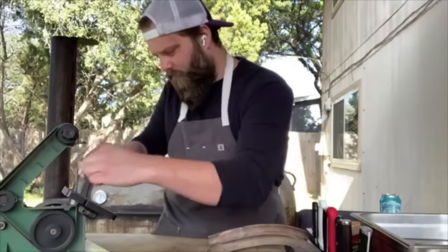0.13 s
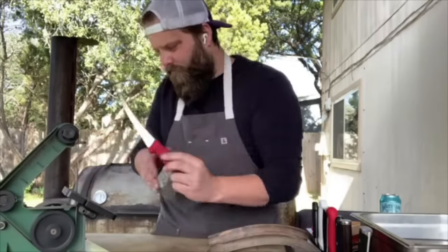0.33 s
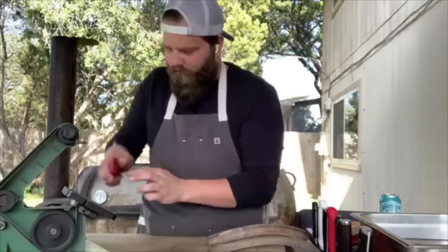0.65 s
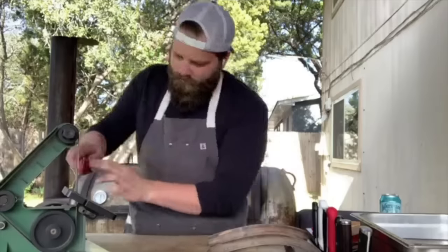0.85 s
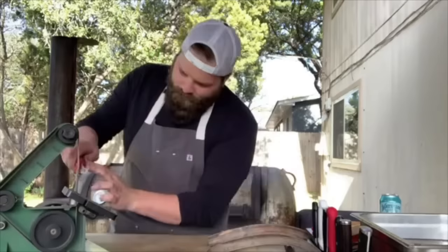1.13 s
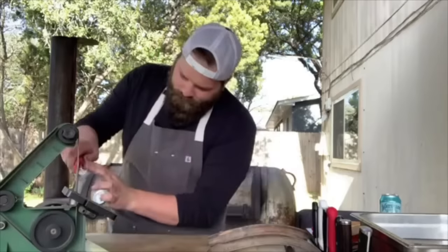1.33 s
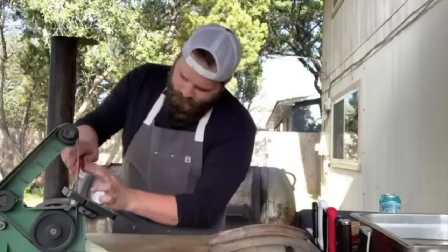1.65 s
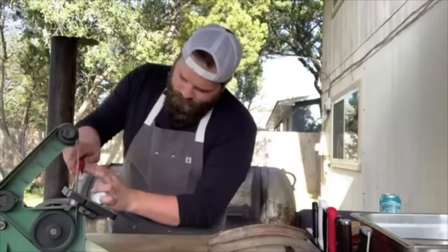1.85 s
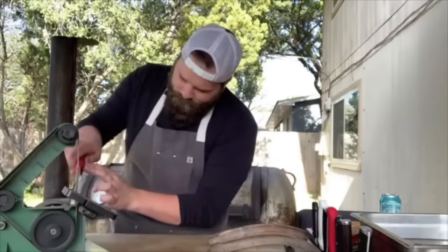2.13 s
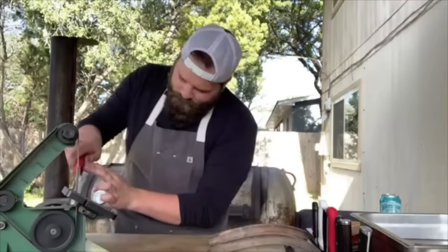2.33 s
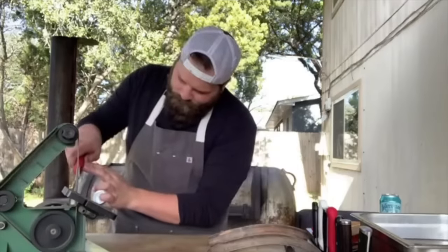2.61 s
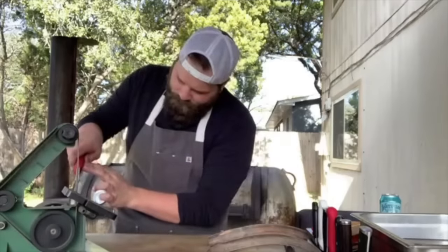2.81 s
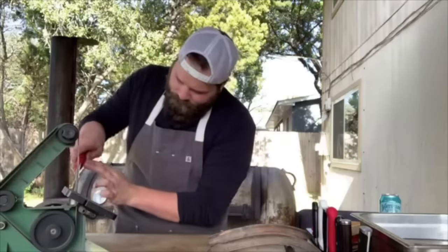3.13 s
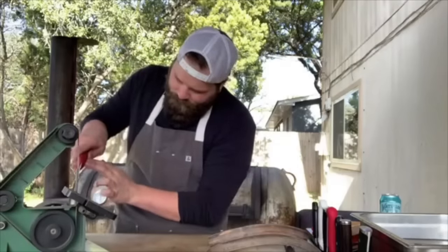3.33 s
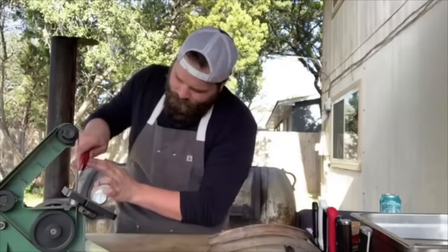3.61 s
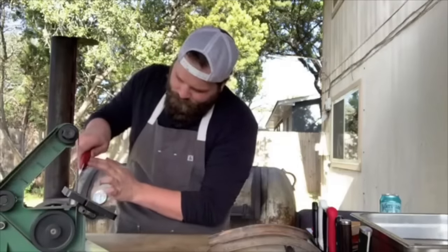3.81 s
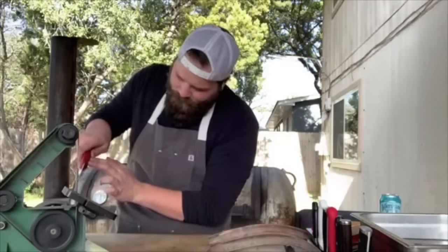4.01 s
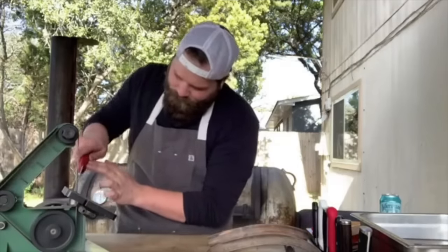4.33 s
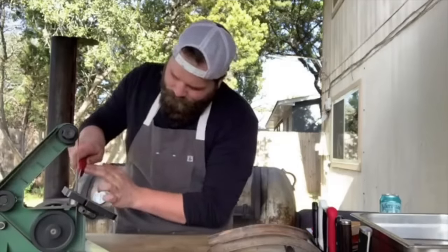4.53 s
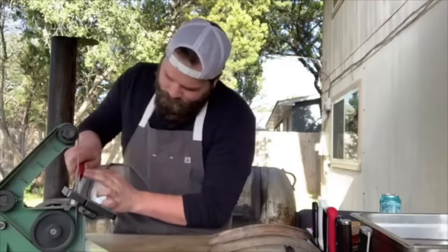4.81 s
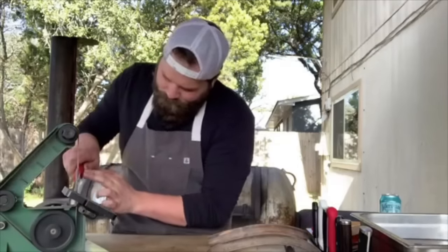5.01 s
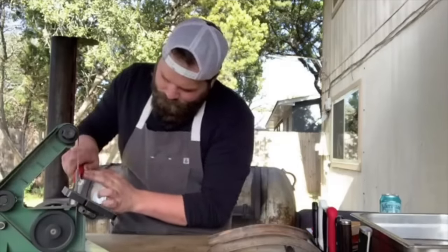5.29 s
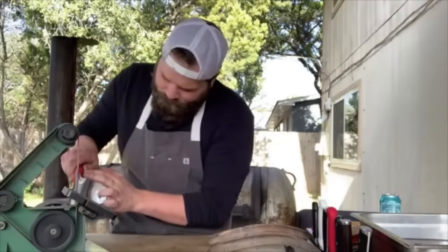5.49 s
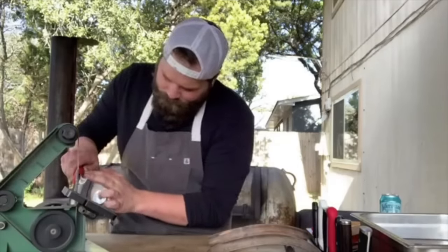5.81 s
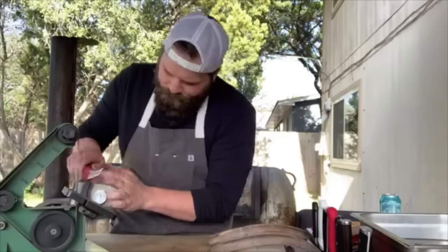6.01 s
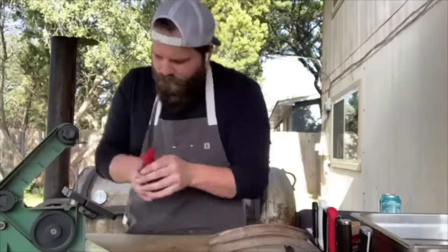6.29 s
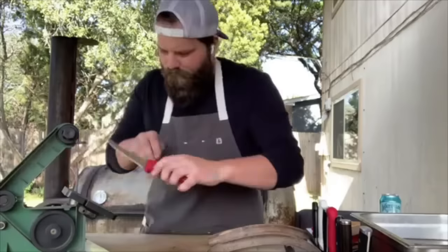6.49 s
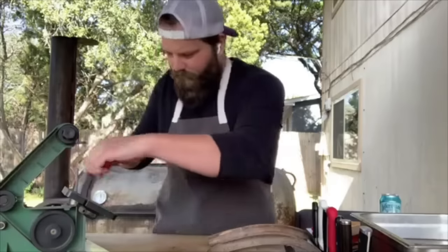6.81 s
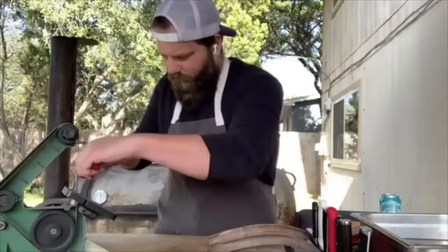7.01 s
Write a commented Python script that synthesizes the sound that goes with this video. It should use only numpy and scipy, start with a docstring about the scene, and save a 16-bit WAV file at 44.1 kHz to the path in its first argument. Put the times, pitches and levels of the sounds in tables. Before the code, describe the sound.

A small belt sander runs throughout in a yard beside a house wall, its gritty belt hissing and fluttering very fast. A knife touches lightly and the wheel sings in short high swells; then the blade bears down, grinding and chattering in short metallic squeals, worst near two seconds. It settles to steady scraping with sharp grain ticks, then lifts as the singing returns. Close, mono, thin narrow-band microphone with little bass.

```python
"""Beside a house wall in a yard, a small belt sander runs; its gritty belt hisses in time with a small wheel.
A knife presses briefly, then barely touches, and the wheel sings in short swells until about 1.4 s.
The blade bears down, hardest at 2 s: the wheel slows, grit grinds and the steel chatters in short squeals.
From about 3.7 s mostly grinding and sharp ticks of coarse grains are left; after 6.2 s the blade eases off
and the song returns. Filtered noise, friction-driven modes and sines pass a narrow-band microphone."""
import sys
import numpy as np
from scipy import signal
from scipy.fft import rfft, irfft, next_fast_len
from scipy.io import wavfile
from scipy.ndimage import uniform_filter1d

SR = 44100
rng = np.random.default_rng(int(sys.argv[2]) if len(sys.argv) > 2 else 0)


def master_out(mix):
    """Clip the mix to full scale and print it as 16-bit PCM to the path in sys.argv[1]."""
    frames = np.transpose(np.atleast_2d(mix))
    ceiling = np.clip(frames, -1, 1)
    pcm = np.round(ceiling * 32767).astype(np.int16)
    wavfile.write(sys.argv[1], SR, pcm)


N = 315315
TIME = np.arange(N) / SR

# Layer levels hold ahead of the echoes and the microphone.
# low rumble of motor and air: f/Hz, relative level/dB per Hz
RUMBLE_COLOUR = [(25, -25.5), (45, -12.5), (70, -7), (120, -3.5), (250, -2), (350, -1), (480, -1.5),
                 (600, 3), (780, 1.5)]
# low rumble, and thrum of the frame under the blade: t/s, rumble level/dB, thrum level/dB
RUMBLE_LEVEL = [(0, -70, -94), (.7, -72, -94), (1.1, -70, -80.5), (2, -69, -79), (2.8, -72, -84),
                (3.8, -75, -96), (5.6, -71.5, -96.5), (7.15, -74, -98)]
# thin motor whine that comes and goes: t/s, mean f/Hz, level/dB ahead of its waver
WHINE = [(0, 700, -92), (1.9, 693, -91), (2.75, 697, -79), (3.3, 700, -90), (3.75, 706, -81),
         (4.35, 704, -85.5), (4.9, 707, -93), (5.4, 708, -78), (6.0, 710, -83), (6.25, 723, -80),
         (7.15, 716, -79)]
# steady notes of the drive: f/Hz running free, level/dB ahead of the waver
DRIVE_NOTES = [(818, -73), (885, -62), (916, -66)]
DRIVE_SAG = .012   # share of the pitch lost at full pressure
DRIVE_WANDER_HZ, DRIVE_WAVER_DB = 1.52, 2.5   # rms
# air whirring round the free run of the belt: t/s, level/dB
WHIRR = [(0, -52.5), (.5, -51), (1.1, -54.5), (2.1, -54.5), (3.4, -61), (4.7, -55), (6.1, -58.5),
         (6.38, -50.5), (6.7, -57), (7.15, -56)]
# dull rush between the whirr and the grinding: t/s, level/dB
RUSH = [(0, -69), (.3, -68), (1.0, -58), (1.5, -59.5), (2.0, -58.5), (2.7, -56), (3.8, -55), (6.3, -53.5),
        (7.15, -57.5)]
# colour of belt and steel: f/Hz, relative level/dB per Hz
COLOUR = [(600, -9), (900, -10.5), (1080, -5), (1300, -8.5), (1550, -4), (1950, -5), (2500, -6.5),
          (3400, -8), (3900, -10.5), (4600, 4), (5500, 6), (6100, 1.5), (6600, -7.5), (7300, -5)]
# resonances of frame, wheels and plate: f/Hz, width/Hz, lift/dB
RESONANCES = [(821, 9, 4), (874, 16, 8), (908, 12, 4.5), (1697, 54, 4), (1970, 130, 2.5), (2340, 46, 4),
              (3660, 300, 0), (4126, 250, 4), (4840, 67, 2.5), (5290, 100, 3), (5550, 140, -4.5),
              (5865, 71, 3.5), (6885, 93, 8), (7300, 150, 6)]
# belt running over plate and wheel: t/s, zing level/dB ahead of its trim, nominal flutter depth/dB
BELT = [(0, -34, -0.7), (.25, -37.5, 2.2), (.7, -37.5, 2), (1.2, -34, 1.5), (1.6, -33, 2), (1.87, -33, 1.5),
        (2.04, -31, 1.5), (2.3, -36, 2), (2.46, -35, 1.5), (2.57, -38, -0.5), (2.83, -34.5, 3),
        (3.1, -36, 1), (3.5, -36.5, -0.5), (4.1, -38, 2.3), (4.55, -36, 1.2), (5.1, -36.5, 2),
        (5.85, -35.5, 2), (6.17, -34.5, 2.5), (6.5, -38.5, 3), (7.15, -40.5, 3)]
FREE_TURNS_PER_S, DRAG_TURNS_PER_S = 72.9, 6.8   # nominal: running free, and lost at full pressure
# a steel wheel sings under the belt and swells: t/s, f/Hz, level/dB, length/s
SONG_SWELLS = [(0.457, 4920, -34, 0.014), (0.827, 2466, -43, .05), (0.929, 4930, -35.5, 0.024),
               (1.015, 4910, -37, 0.04), (1.1, 4930, -23, .005), (1.104, 4945, -28, 0.012),
               (1.147, 4950, -35, .026), (1.19, 4930, -41, 0.25), (1.326, 4930, -37, 0.018),
               (1.2, 2485, -46, 0.2), (1.359, 2466, -39, .05), (6.24, 4920, -43, 0.08),
               (6.703, 4900, -44, 0.021), (6.777, 4920, -46, 0.047), (6.869, 4840, -41, 0.047),
               (6.93, 4910, -42.5, .1), (7.02, 4930, -38, 0.032), (7.10, 4920, -39, 0.028)]
SONG_HZ, SONG_DB = 4990, -55.5   # between the swells
SONG_SHARPNESS = 85   # pitch over nominal width
# coarsest grains hit the steel at the crest of a turn: t/s, level/dB ahead of band and trim
TICKS = [(.110, -31), (.178, -29), (0.385, -31), (0.917, -33), (.999, -34), (1.013, -28), (1.042, -28),
         (1.066, -26.5), (1.136, -31), (1.151, -24.5), (1.166, -27), (1.1786, -25), (1.248, -27),
         (1.289, -32), (1.3156, -28), (1.331, -31), (1.344, -32), (1.357, -30), (1.370, -28),
         (1.3843, -26.5), (1.938, -29), (1.967, -29), (2.028, -26), (2.042, -25.5), (2.120, -31),
         (2.153, -23), (2.240, -22.5), (2.360, -27), (2.825, -27), (2.837, -28), (2.851, -30), (3.313, -26),
         (3.438, -27), (4.497, -28), (4.619, -28), (4.722, -32), (5.039, -32), (5.052, -28), (5.1912, -28),
         (5.221, -31), (5.2466, -28), (5.29, -27.5), (5.3028, -25), (5.400, -28.5), (5.541, -29),
         (5.555, -25), (5.595, -30), (5.610, -32), (5.623, -19.5), (5.748, -31), (5.775, -37), (5.790, -35),
         (5.888, -30), (5.902, -31), (5.930, -30), (5.970, -34), (5.999, -31), (6.012, -31), (6.026, -28),
         (6.039, -27), (6.109, -29), (6.137, -27.5), (6.166, -28), (6.192, -29.5), (6.235, -27.5),
         (6.276, -31), (6.302, -32)]
# finer grains, in dB: against the zing, rise per dB of flutter, spread
TICK_OVER_DB, TICK_PER_FLUTTER, TICK_SPREAD_DB = -4.5, 1.0, 0.8
# one stroke of the knife: t/s, pressure on the belt 0-1, rasp level/dB of the edge
STROKE = [(0, 0.56, -36.5), (.17, .05, -40.5), (.8, 0.06, -41), (1.199, 0.52, -40.5), (1.75, 0.64, -39.5),
          (2.0, 1, -36.5), (2.22, .85, -36), (2.35, 0.55, -34.5), (2.47, 0.66, -35.5), (2.68, 0.61, -38.5),
          (3.549, 0.5, -38.5), (3.85, 0.43, -40.5), (4.3, .38, -40.5), (4.7, 0.5, -39.5), (5.25, 0.39, -40),
          (5.6, .45, -41), (5.92, 0.6, -40.5), (6.2, .25, -42), (6.45, 0.06, -42.5), (7.15, 0.2, -45)]
# brief dips of belt and grinding: t/s, change/dB, length/s
DIPS = [(3.394, -12, 0.012)]
# modes that steady grinding, then rasp, keeps ringing: f/Hz, level/dB against that drive ahead of feedback
SUSTAINED = [(1920, -1.5), (3490, -10.5)]
# blade bumping the backing plate: t/s, level/dB
BUMPS = [(1.909, -35.5), (1.914, -34)]
# modes of the blade: f/Hz, nominal width/Hz, relative level/dB
BLADE_MODES = [(1596, 280, -20), (1950, 156, -11), (2370, 240, -7), (3125, 260, -21.5), (3540, 160, -19),
               (4480, 140, -13.5), (4900, 110, -20.5), (5200, 270, -5), (5650, 280, -7.5), (5940, 260, -12)]
RING_DB_PER_PRESSURE = 18   # how steeply all modes together rise from no to full pressure
# the blade catches on the belt and squeals: t/s at the middle, f/Hz, level/dB ahead of trim, length/s
CATCHES = [(1.058, 2050, -30.5, 0.0056), (1.097, 1750, -21, 0.0024), (1.1005, 1960, -22, 0.0035),
           (1.108, 1750, -28, 0.0065), (1.144, 1680, -35, 0.0064), (1.180, 1630, -36.5, .007),
           (1.264, 1658, -27.5, 0.0086), (1.318, 1660, -36.5, .006), (1.455, 1533, -33, 0.021),
           (1.593, 1930, -22, 0.005), (1.601, 1900, -25, 0.0052), (1.609, 1850, -22.5, .004),
           (1.6435, 1845, -21, .004), (1.662, 1800, -31, 0.0057), (1.6935, 1930, -24, .005),
           (1.704, 1813, -31, 0.014), (1.724, 1620, -33.5, 0.008), (1.750, 1560, -35, .006),
           (1.770, 1886, -28, 0.0096), (1.800, 1630, -36, .005), (1.838, 1944, -28.5, 0.015),
           (1.863, 3520, -32.5, 0.0094), (1.870, 2110, -24.5, 0.0068), (1.887, 2330, -31, 0.0068),
           (1.891, 1970, -26, 0.0091), (1.944, 2020, -25, 0.0089), (1.945, 2400, -27, 0.0087),
           (1.949, 3630, -36, .007), (1.967, 2050, -23, 0.0041), (1.990, 2330, -27, 0.0073),
           (1.985, 5400, -29, .006), (2.000, 5420, -30, 0.008), (2.003, 1983, -22.5, 0.03),
           (2.028, 2420, -26.5, .007), (2.028, 5600, -26, .0053), (2.049, 1907, -21.5, 0.009),
           (2.056, 5480, -30, .007), (2.084, 5600, -31, .006), (2.075, 1950, -26, 0.015),
           (2.077, 4820, -26, 0.0059), (2.106, 2114, -23, 0.008), (2.106, 5300, -30, .009),
           (2.110, 3500, -31, 0.0075), (2.148, 1990, -28.5, 0.0081), (2.152, 2480, -28, 0.0084),
           (2.167, 1790, -26, 0.0035), (2.174, 2890, -28.5, 0.016), (2.226, 1990, -27, 0.011),
           (2.228, 4650, -33, .012), (2.255, 3240, -24.5, 0.0093), (2.256, 5330, -26, 0.0064),
           (2.268, 5600, -30, 0.0069), (2.289, 3070, -23.5, 0.005), (2.301, 1880, -27, 0.01),
           (2.332, 3080, -29.5, .006), (2.387, 3370, -28, .01), (2.399, 1870, -34.5, .008),
           (2.406, 3500, -27.5, .013), (2.404, 4050, -35, .004), (2.411, 2770, -23.5, 0.0047),
           (2.429, 3480, -25, 0.0096), (2.426, 1895, -33, 0.0091), (2.437, 2540, -28, 0.004),
           (2.446, 3450, -24, .008), (2.4505, 3180, -17.5, 0.0024), (2.453, 2660, -26, .003),
           (2.461, 3460, -26, 0.0089), (2.479, 2840, -36.5, .008), (2.481, 3500, -23.5, 0.011),
           (2.494, 3580, -23.5, .01), (2.462, 4140, -34.5, .012), (2.503, 4150, -31.5, 0.006),
           (2.516, 4250, -34, .006), (2.507, 3544, -26.5, 0.011), (2.503, 1930, -27.5, 0.012),
           (2.517, 3430, -24.5, 0.0083), (2.518, 1960, -24.5, 0.0043), (2.542, 1900, -33, 0.0039),
           (2.556, 3460, -30, 0.022), (2.583, 3425, -29, .015), (2.615, 3430, -27, 0.013),
           (2.617, 1880, -30.5, 0.0095), (2.682, 1990, -29, 0.0031), (2.712, 2090, -36, .008),
           (2.727, 1770, -34.5, 0.0097), (2.755, 3470, -36.5, 0.016), (2.793, 3440, -38.5, 0.0099),
           (2.922, 1925, -32.5, 0.0063), (2.959, 2000, -27.5, 0.0089), (2.973, 3419, -37, .012),
           (2.993, 2030, -29, 0.0094), (3.036, 2090, -30.5, 0.0078), (3.041, 2300, -30, 0.0048),
           (3.054, 3520, -27.5, 0.011), (3.154, 2070, -30, 0.0051), (3.329, 3530, -34, 0.0058),
           (3.331, 1990, -27.5, 0.016), (3.384, 1965, -27.5, 0.0072), (3.423, 1870, -28.5, 0.009),
           (3.461, 1990, -27, 0.008), (3.503, 1700, -33.5, 0.0058), (3.577, 2200, -33, 0.0097),
           (3.579, 3570, -35.5, 0.012), (3.600, 5000, -32.5, 0.01), (3.612, 1990, -35, 0.026),
           (3.652, 1820, -27.5, 0.0025), (4.775, 3400, -41, 0.029), (4.8245, 3440, -25, .004),
           (5.626, 5270, -29, 0.0064), (5.924, 1905, -29, 0.0083)]
# lesser catches at random; below the grip pressure they are all but silent
SMALL_CATCH_COUNT, SMALL_CATCH_S, GRIP_PRESSURE = 220, 0.007, 0.4
SMALL_CATCH_DB, SMALL_CATCH_SPREAD_DB = -26, 5   # base for a grip of 1, and spread
SMOOTH_BITE_DB = -4.5   # change while the edge runs smoothly
FULL_RASP_PRESSURE = 0.71   # under lighter pressure a squeal carries less rasp
# a squeal is pure while the edge rasps little and turns coarse as it rasps more
PURE_RASP_DB, COARSE_RASP_DB = -40.5, -35.5
# share of nominal mode width, evenness 0-1, depth of stick and slip/dB, drive of the other modes/dB
PURE_SQUEAL, COARSE_SQUEAL = (.5, .8, 1.5, -5), (1.05, .45, 3.4, 1)
SLIPS_PER_S = 560   # new random stick-slip levels a second
# echoes from bench, sander body, ground and wall: delay/s, level/dB
ECHOES = [(.00262, -31), (.00305, -26), (.0069, -17.5), (0.0122, -15), (0.016, -15)]
# the microphone's bass cut sets in abruptly: f/Hz, gain/dB
BASS_CUT = [(30, -53), (500, -20), (775, -13), (808, -1)]
CUTOFF_HZ = 8020


def from_db(db):
    """Gain of a level in dB."""
    return 10 ** (np.asarray(db) / 20)


def rms_one(x):
    """The same sound at rms 1."""
    return x / np.sqrt(np.mean(x ** 2) + 1e-20)


def in_time(rows):
    """Each column of a curve, at every sample."""
    s, *columns = np.transpose(rows)
    return [np.interp(TIME, s, column) for column in columns]


def at_hz(points, hz):
    """Reads a table on a log-frequency axis."""
    known, values = np.transpose(points)
    return np.interp(np.log(hz + 1), np.log(known), values)


def drift(rate):
    """Smooth chance with about `rate` new values a second, at rms 1."""
    return rms_one(np.interp(TIME * rate, np.arange(8000), rng.standard_normal(8000)))


def shape(x, gain_at):
    """Filters by a gain given as a function of frequency."""
    size = next_fast_len(N + 8192)
    hz = np.fft.rfftfreq(size, 1 / SR)
    return irfft(rfft(x, size) * gain_at(hz), size)[:N]


def band(hz, low_hz, high_hz, order=12):
    """Gain of a band with rounded corners and steep edges."""
    low_edge = 1 + (low_hz / (hz + 1)) ** (2 * order)
    high_edge = 1 + (hz / high_hz) ** (2 * order)
    return 1 / np.sqrt(low_edge * high_edge)


def swell(t, length):
    """A bell around t = 0 whose power stays above half for `length`."""
    return 2 ** (-2 * np.minimum((t / length) ** 2, 20))


def burst(sound, envelope):
    """A sound under an envelope, at rms 1 where the envelope is 1."""
    shaped = sound * envelope
    return shaped * np.sqrt(np.sum(envelope ** 2) / np.sum(shaped ** 2))


def add(out, s, sound):
    """Mixes in a short sound with its middle at s."""
    at = round(s * SR) - len(sound) // 2 + np.arange(len(sound))
    inside = (at >= 0) & (at < N)
    out[at[inside]] += sound[inside]


def tone(hz):
    """A sine that follows a pitch curve, at rms 1."""
    return np.sqrt(2) * np.sin(2 * np.pi * np.cumsum(hz) / SR)


def squeal(t, hz, width_hz, evenness):
    """A friction-driven mode: its phase wanders, its height is partly held by the rubbing."""
    r = np.exp(-np.pi * 1.55 * width_hz / SR)
    push = rng.standard_normal((2, len(t)))
    motion = signal.lfilter([1], [1, -2 * r, r * r], push[0] + 1j * push[1])
    held = motion / (abs(motion) + 1e-9) ** np.clip(evenness, 0, 1)
    return np.real(held * np.exp(2j * np.pi * hz * t))


def grit(per_s, spread_db, smooth):
    """Force of abrasive grains of uneven size on top of smooth rubbing."""
    sizes = from_db(spread_db * np.minimum(rng.exponential(1, N), 4)) * rng.choice([-1, 1], N)
    hits = rng.random(N) < per_s / SR
    return rms_one(sizes * hits) + smooth * rng.standard_normal(N)


def through_sander(force, low_hz, high_hz):
    """What belt, steel and frame radiate of a contact force within one band."""
    def gain_at(hz):
        lift = sum(db / (1 + (2 * (hz - centre) / width) ** 2) for centre, width, db in RESONANCES)
        return from_db(at_hz(COLOUR, hz) + lift) * band(hz, low_hz, high_hz)
    return shape(force, gain_at)


def knocks(rows, low_hz, high_hz, length):
    """Very short bursts of contact noise in one band."""
    out, t = np.zeros(N), np.arange(-1000, 1000) / SR
    body = signal.butter(2, [low_hz, high_hz], "band", fs=SR, output="sos")
    for s, db in rows:
        noise = signal.sosfilt(body, rng.standard_normal(len(t)))
        add(out, s, from_db(db) * burst(noise, swell(t, length)))
    return out


def pressure_on_belt():
    """How hard the blade is pressed, 0-1, at every sample."""
    return np.clip(in_time(STROKE)[0], 0, 1)


def yard(x):
    """A few hard surfaces close by answer; the open air gives no tail."""
    return x + sum(from_db(db) * np.interp(TIME - delay, TIME, x, left=0) for delay, db in ECHOES)


def low_hum():
    """A faint, wavering motor whine over a low rumble; the frame thrums while the blade bears down."""
    whine_hz, whine_db = in_time(WHINE)
    rumble_db, thrum_db = in_time(RUMBLE_LEVEL)
    whine = tone(whine_hz + 2 * drift(30)) * from_db(3.2 * drift(12))
    noise = rng.standard_normal(N)
    rumble = rms_one(shape(noise, lambda f: from_db(at_hz(RUMBLE_COLOUR, f)) * band(f, 20, 850)))
    thrum = rms_one(squeal(TIME, hz=345, width_hz=71, evenness=0))
    return from_db(whine_db) * whine + from_db(rumble_db) * rumble + from_db(thrum_db) * thrum


def drive_notes():
    """The drive hums on a few clean notes that waver a little and sag as the blade drags."""
    speed = 1 - DRIVE_SAG * pressure_on_belt()
    out = np.zeros(N)
    for hz, db in DRIVE_NOTES:
        gain = from_db(db + DRIVE_WAVER_DB * drift(5))
        out += gain * tone(hz * speed + DRIVE_WANDER_HZ * drift(9))
    return out


def motor():
    """The frame drones on its low resonances and the belt stirs the air."""
    force = grit(per_s=1200, spread_db=3.0, smooth=1.9)
    whirr_db = in_time(WHIRR)[0]
    drone_db = -62.0 + .2 * (whirr_db - whirr_db.mean())
    drone = from_db(drone_db) * rms_one(through_sander(force, 780, 910))
    rush = from_db(in_time(RUSH)[0]) * rms_one(through_sander(rng.standard_normal(N), 1150, 1355))
    whirr = from_db(whirr_db) * rms_one(through_sander(force, 910, 1174))
    return drone + drive_notes() + rush + whirr


def wheel_turns():
    """Turns made so far; drag grows with the cube of the pressure, and a turn ends at every coarse tick."""
    turns = np.cumsum(FREE_TURNS_PER_S - DRAG_TURNS_PER_S * pressure_on_belt() ** 3) / SR
    tick_s = np.transpose(TICKS)[0]
    slip = np.unwrap(np.interp(tick_s, TIME, turns) % 1, period=1)
    return turns - np.interp(TIME, tick_s, slip)


def wheel_beat(slap):
    """The wheel runs out of round: the belt tightens once a turn, with a sharp crest."""
    turn, depth_db = 2 * np.pi * wheel_turns(), in_time(BELT)[1]
    crest = np.cos(turn) + slap * np.cos(2 * turn)
    beat = from_db(depth_db * crest * (1 + .15 * drift(69)))
    return beat / np.sqrt(uniform_filter1d(beat ** 2, size=4000))   # pulses without shifting the level


def wheel_song(beat):
    """The belt keeps the wheel ringing, pulsing with every turn; now and then a note swells."""
    def note(hz):
        return squeal(TIME, hz, hz / SONG_SHARPNESS, evenness=.45) * np.sqrt(beat)
    swells = sum(from_db(db) * burst(note(hz), swell(TIME - s, length))
                 for s, hz, db, length in SONG_SWELLS)
    return from_db(SONG_DB) * rms_one(note(SONG_HZ)) + swells


def belt():
    """Grit zings over the plate in time with the wheel and leaves a fine hiss; the wheel sings along."""
    zing_db = in_time(BELT)[0]
    beat = wheel_beat(slap=0.24)
    force = grit(per_s=6000, spread_db=4.0, smooth=0.7) * from_db(.5 * drift(45))
    zing = rms_one(through_sander(force * beat, 4170, 6820))
    hiss = rms_one(through_sander(force, 5910, 8000))
    hiss_db = -48.0 + 0.39 * (np.minimum(zing_db, -35) + 32.5)
    return from_db(zing_db - 1.8) * zing + from_db(hiss_db) * hiss + wheel_song(beat)


def small_ticks():
    """On turns without a coarse grain, finer ones hit at the crest, harder where the belt flutters deeply."""
    crests = np.flatnonzero(np.diff(np.floor(wheel_turns())))
    zing_db, flutter_db = in_time(BELT)
    db = zing_db + TICK_OVER_DB + TICK_PER_FLUTTER * flutter_db
    sizes = np.minimum(rng.standard_normal(size=600), 2)
    coarse_s = np.transpose(TICKS)[0]
    return [(TIME[i], db[i] + TICK_SPREAD_DB * size) for i, size in zip(crests, sizes)
            if min(abs(coarse_s - TIME[i])) > .5 / FREE_TURNS_PER_S]


def grain_ticks():
    """Coarse and fine grains hit the steel, which answers in one band only."""
    ticks = knocks(list(TICKS) + small_ticks(), low_hz=5000, high_hz=5850, length=0.0029)
    return from_db(-0.5) * shape(ticks, lambda hz: band(hz, 4550, 6150))


def mode_width(hz):
    """How broadly the blade rings at a pitch: nominal width in Hz."""
    return at_hz([mode[:2] for mode in BLADE_MODES], hz)


def grinding(light_db, pressed_db):
    """Grit scrapes the blade; pressed harder, it bites louder and less evenly and makes the steel ring."""
    pressure, rasp_db = pressure_on_belt(), in_time(STROKE)[1]
    grind_db = light_db + (pressed_db - light_db) * pressure
    force = grit(per_s=2500, spread_db=1.0, smooth=0.73) * from_db((-0.05 + 2.7 * pressure) * drift(160))
    grind = through_sander(force * from_db((1.0 + 0.32 * pressure) * drift(60)), 1384, 2140)
    rasp = through_sander(force * from_db(1.0 * drift(50)), 2300, 4015)
    out = from_db(grind_db) * rms_one(grind) + from_db(rasp_db) * rms_one(rasp)
    for (hz, db), drive_db in zip(SUSTAINED, (grind_db, rasp_db)):
        feedback_db = 0.42 * np.maximum(drive_db + 39.5, 0)   # a strong drive makes the mode feed itself
        ringing = squeal(TIME, hz, mode_width(hz), evenness=0.15) * from_db(3.5 * drift(55))
        out += from_db(drive_db + db + feedback_db) * pressure * rms_one(ringing)
    return out


def coarseness(s):
    """How coarsely the edge bites at a moment, 0-1."""
    when, _, rasp_db = np.transpose(STROKE)
    return np.interp(np.interp(s, when, rasp_db), [PURE_RASP_DB, COARSE_RASP_DB], [0, 1])


def small_catches():
    """Random catches, louder with pressure; each picks a mode, the livelier ones more often."""
    when, pick = rng.random((SMALL_CATCH_COUNT, 2)).T
    size, detune = rng.standard_normal((SMALL_CATCH_COUNT, 2)).T
    hz, _, lively_db = np.transpose(BLADE_MODES)
    odds = np.cumsum(from_db(lively_db) / hz ** 2)   # weighted towards low modes
    pitch = hz[np.searchsorted(odds, pick * odds[-1])] * (1 + 0.018 * detune)
    s = (np.arange(SMALL_CATCH_COUNT) + when) / SMALL_CATCH_COUNT * TIME[-1]
    grip = np.maximum(np.interp(s, TIME, pressure_on_belt()) - GRIP_PRESSURE, 1e-3)
    db = SMALL_CATCH_DB + 20 * np.log10(grip) + SMALL_CATCH_SPREAD_DB * np.minimum(size, 1)
    db = db + SMOOTH_BITE_DB * (1 - coarseness(s))
    return [(*row, SMALL_CATCH_S) for row in zip(s, pitch, db)]


def chatter(scrape_db, rasp_hz):
    """Each catch squeals at one pitch; a coarser bite stutters more and drives the other modes harder."""
    rings, bite_power, rasp_power = np.zeros((3, N))
    t = np.arange(-4000, 4000) / SR
    for s, hz, db, length in list(CATCHES) + small_catches():
        squeal_kind = PURE_SQUEAL + coarseness(s) * np.subtract(COARSE_SQUEAL, PURE_SQUEAL)
        narrowing, evenness, slip_db, others_db = squeal_kind
        slip_curve = np.interp((t - t[0]) * SLIPS_PER_S, np.arange(200), rng.standard_normal(size=200))
        envelope = from_db(db) * burst(from_db(slip_db * slip_curve), swell(t, length))
        add(rings, s, burst(squeal(t, hz, narrowing * mode_width(hz), evenness), envelope))
        add(bite_power, s, (from_db(others_db) * envelope) ** 2)
        # rasp grows with pitch up to rasp_hz
        add(rasp_power, s, (envelope * min(hz / rasp_hz, 1) ** 2) ** 2)
    pressure = pressure_on_belt()
    modes = sum(from_db(db) * rms_one(squeal(TIME, hz, width_hz, evenness=.2))
                for hz, width_hz, db in BLADE_MODES)
    rings += np.sqrt(bite_power) * from_db(RING_DB_PER_PRESSURE * (pressure - 1.5)) * modes
    rings = shape(rings, lambda f: band(f, 1400, 7400))   # little rings below the blade's first mode
    scrape = rms_one(through_sander(grit(per_s=1300, spread_db=-0.5, smooth=0.93), 2700, 4700))
    scrape_gain = from_db(scrape_db) * np.minimum(pressure / FULL_RASP_PRESSURE, 1) ** 3
    return from_db(0.65) * rings + scrape_gain * np.sqrt(rasp_power) * scrape


def scene():
    """Belt, blade and motor from one spot, alike in both channels; the hum is added past the bass cut."""
    dip_db = sum(db * swell(TIME - s, length) for s, db, length in DIPS)
    drone, hum = motor(), low_hum()
    rubbing = (belt() + grinding(light_db=-46.5, pressed_db=-38.0)) * from_db(dip_db)
    bumps = knocks(BUMPS, low_hz=1000, high_hz=1410, length=0.0067)
    blade = chatter(scrape_db=-12.5, rasp_hz=3350) + bumps
    air = yard(rubbing + blade + grain_ticks()) + drone
    sound = shape(air, lambda hz: from_db(at_hz(BASS_CUT, hz))) + hum
    return np.array([sound, sound])


def record(dry):
    """The microphone fades out over the last 480 Hz and passes nothing above its cut-off."""
    def treble_cut(hz):
        return np.clip((CUTOFF_HZ - hz) / 480, 0, 1) ** 2
    return np.array([shape(x, treble_cut) for x in dry])


dry = scene()
out = record(dry)
master_out(out)
```